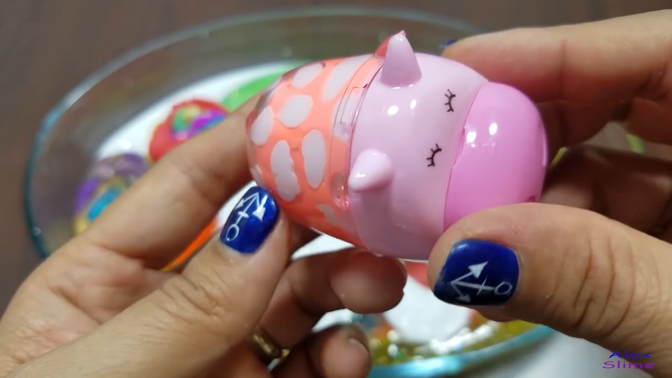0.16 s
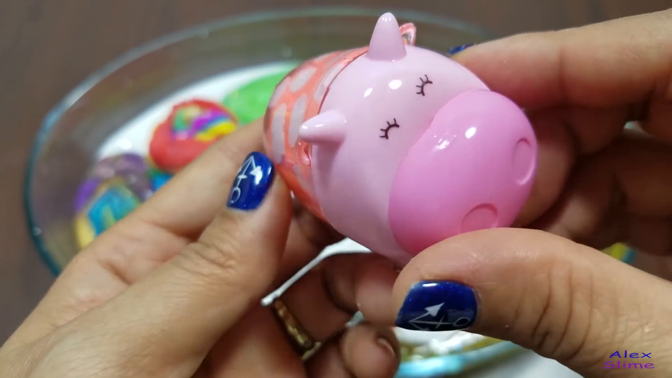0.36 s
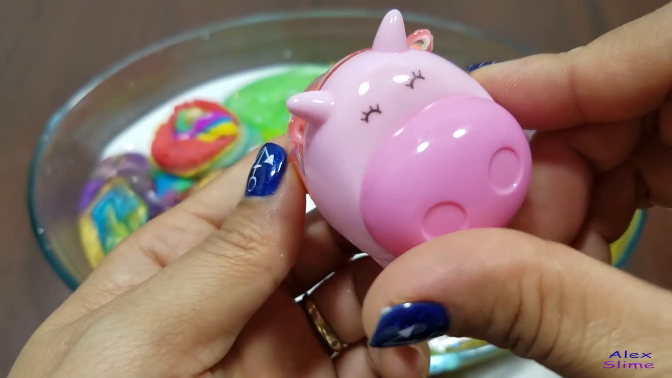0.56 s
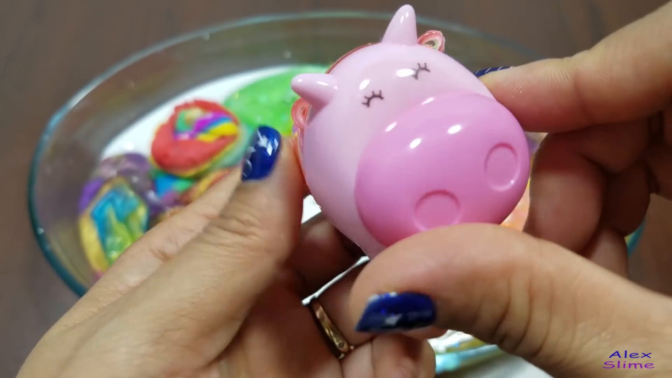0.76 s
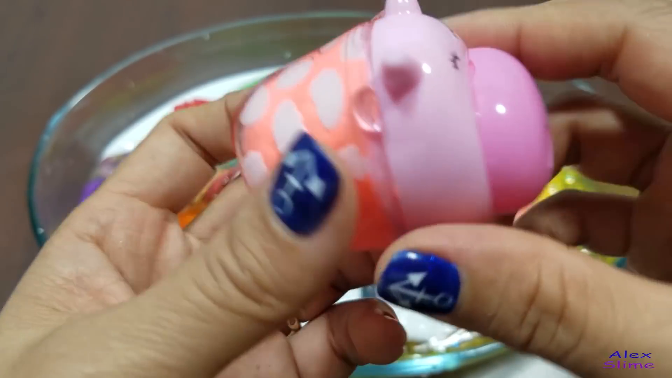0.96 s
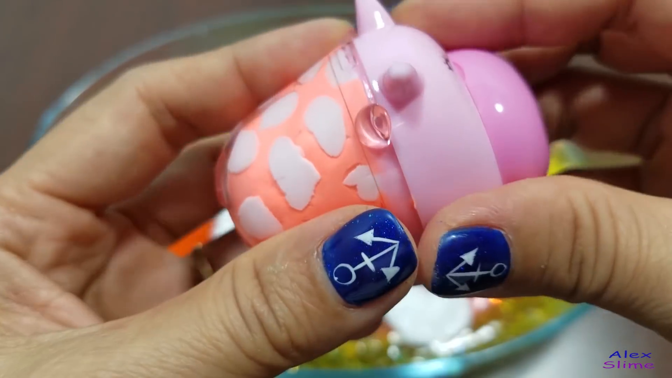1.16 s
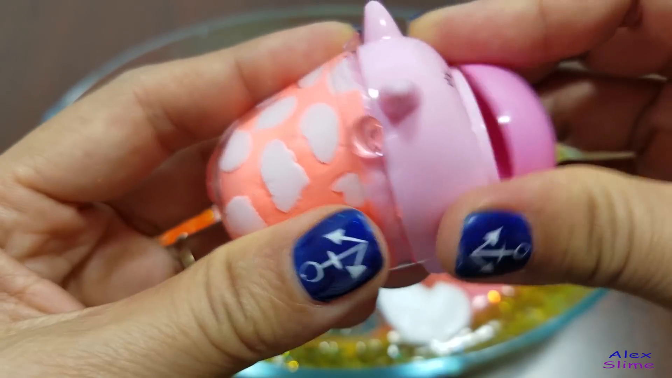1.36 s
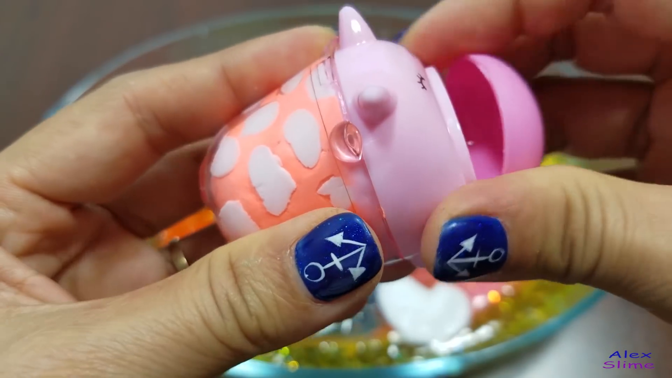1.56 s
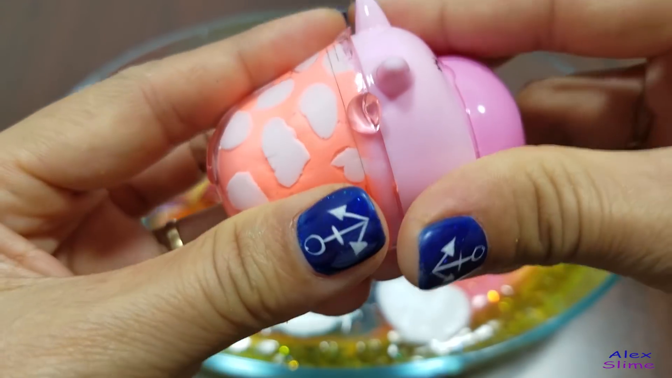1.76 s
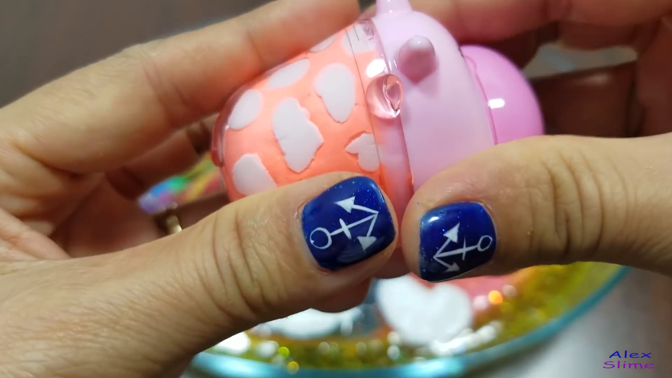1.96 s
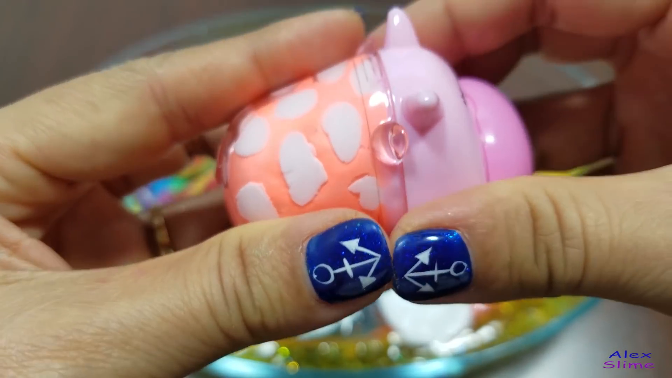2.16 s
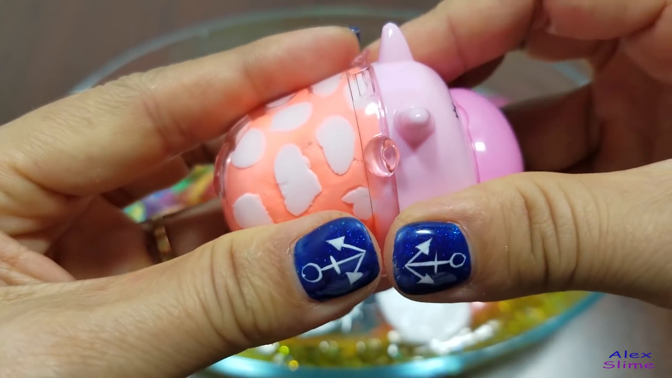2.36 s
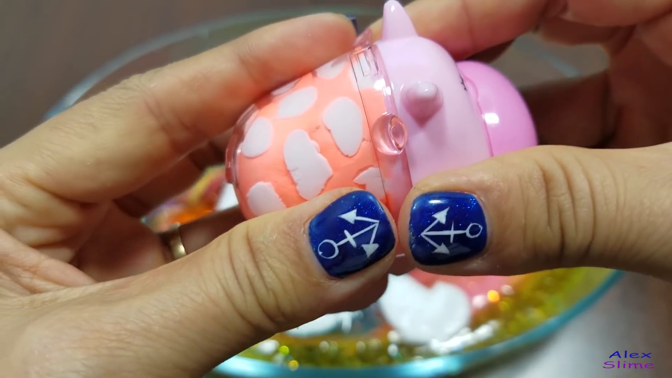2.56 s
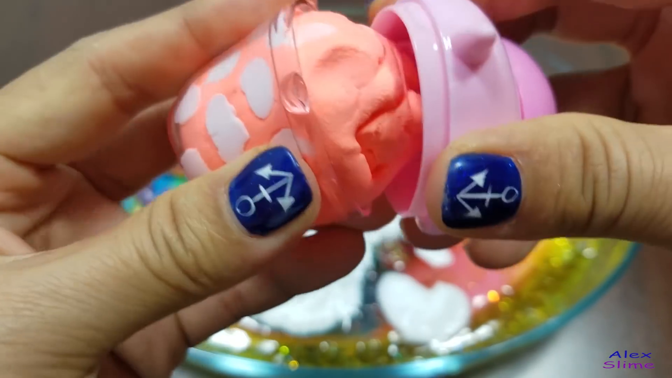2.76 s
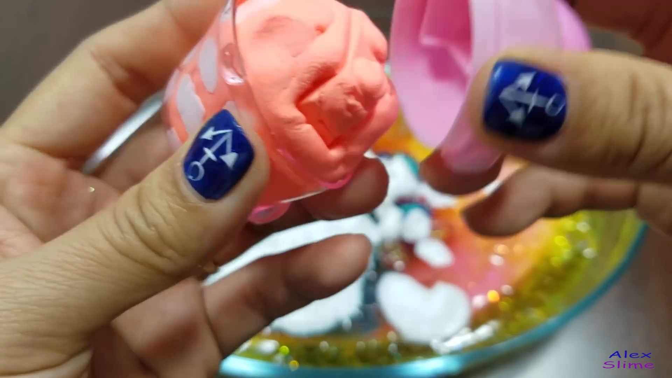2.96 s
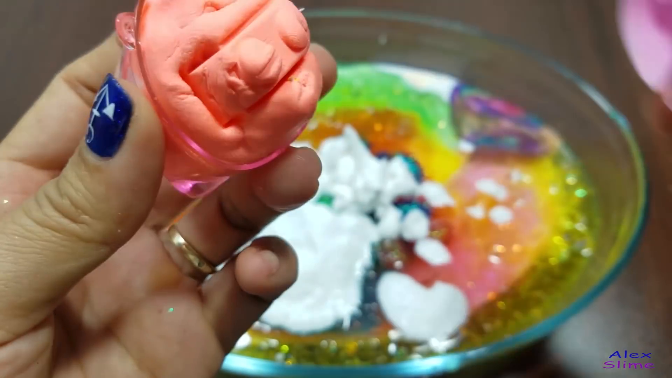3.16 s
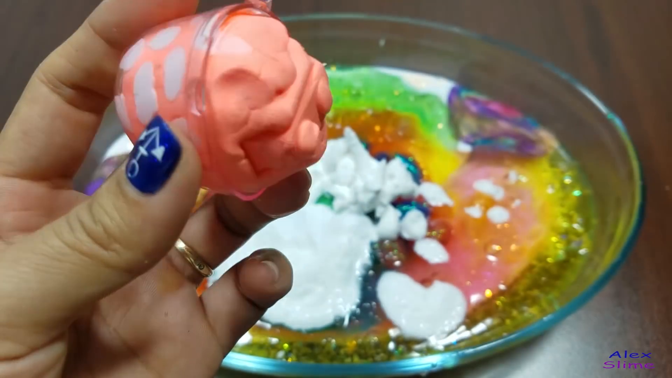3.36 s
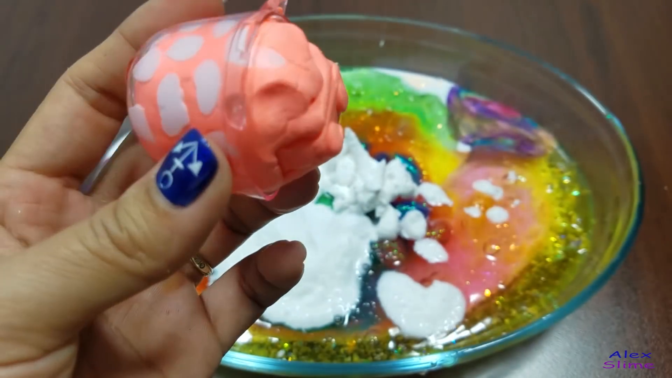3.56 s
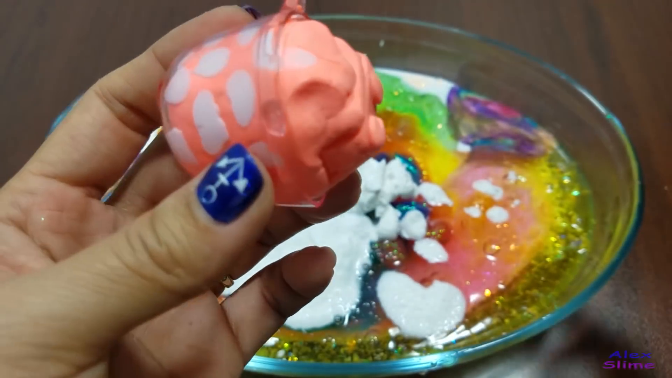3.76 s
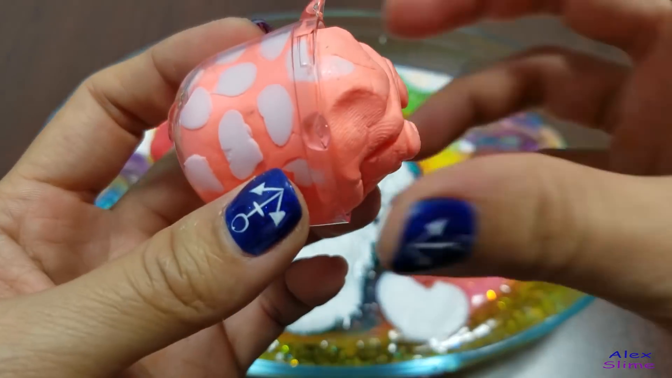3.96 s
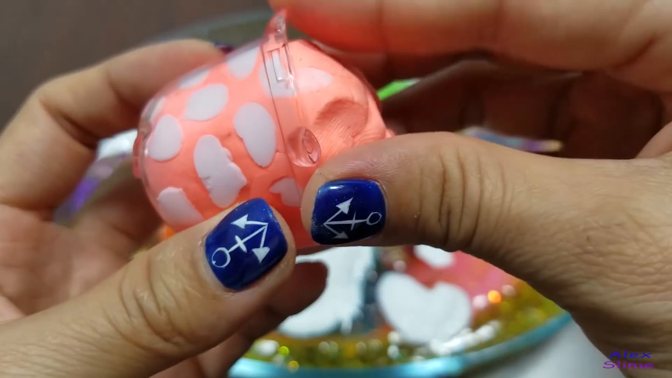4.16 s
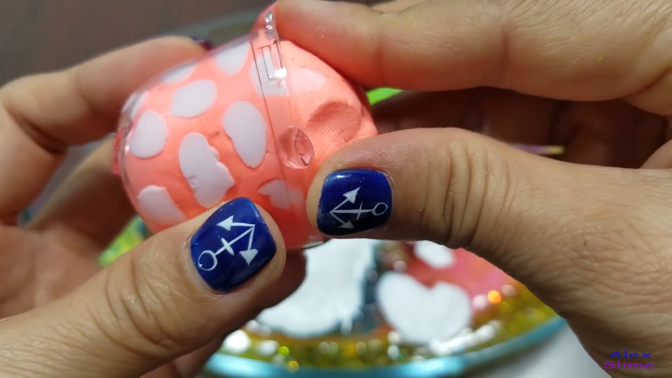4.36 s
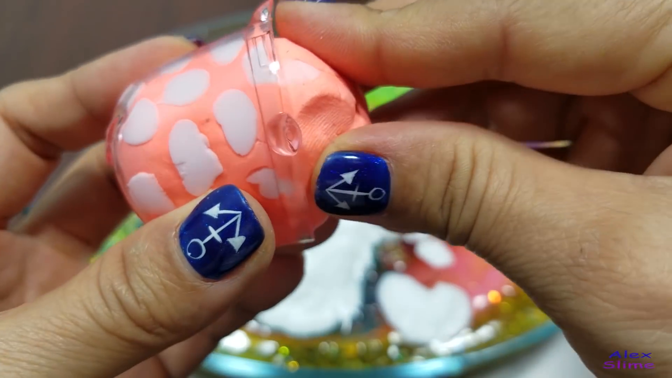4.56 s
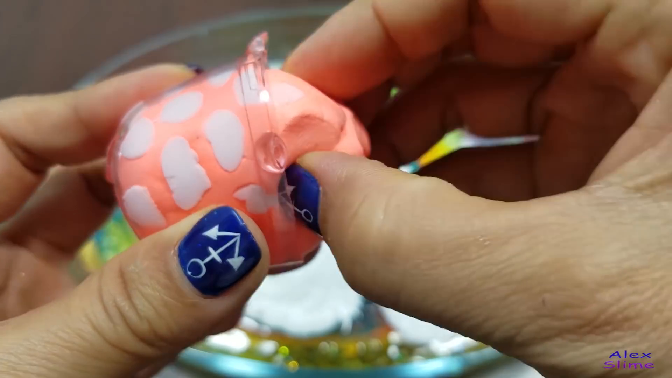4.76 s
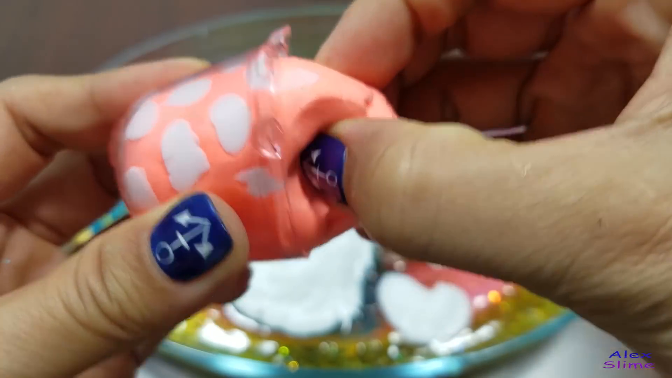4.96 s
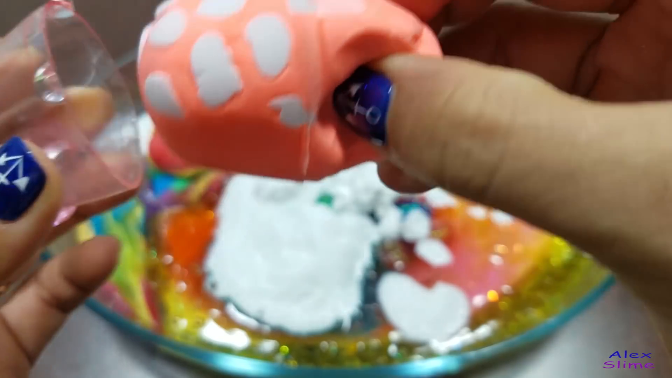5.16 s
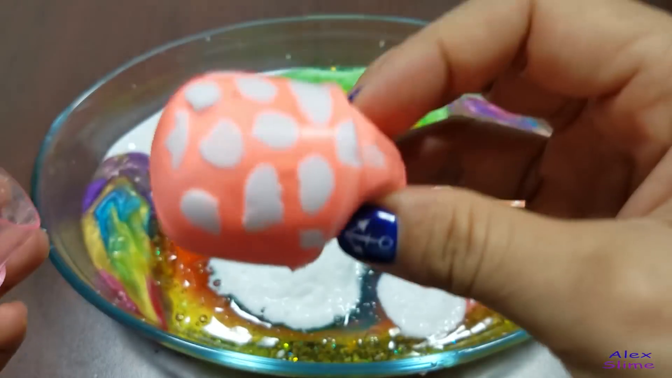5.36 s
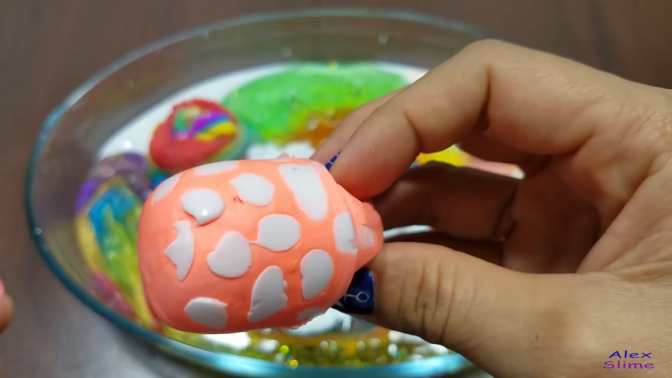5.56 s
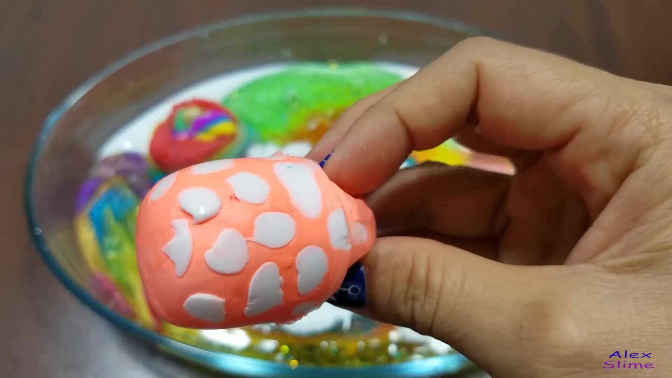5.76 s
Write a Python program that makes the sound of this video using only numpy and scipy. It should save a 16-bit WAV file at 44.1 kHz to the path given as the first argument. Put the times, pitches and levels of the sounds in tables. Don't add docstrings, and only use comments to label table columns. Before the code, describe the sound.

Fingers tick and rub a small hollow plastic capsule, snap it open, its lid clatters onto the table, then a few more nail clicks follow.

```python
import sys
import numpy as np
from scipy import signal
from scipy.fft import rfft, irfft
from scipy.io import wavfile
from scipy.ndimage import uniform_filter1d

SR = 44100
rng = np.random.default_rng(int(sys.argv[2]) if len(sys.argv) > 2 else 0)


def unload_wav(signal):
    wavfile.write(
        sys.argv[1],
        SR,
        np.round(np.clip(np.atleast_2d(signal).T, -1, 1) * 32767).astype(np.int16),
    )


def amplitude_ratio(level_db):
    exponent = np.asarray(level_db, float) / 20
    return 10 ** exponent


N = 256000


def on_log(hz, table):
    f, value = np.array(table).T
    return np.interp(np.log(np.maximum(hz, 1)), np.log(f), value)


def colour(x, table):
    f = np.arange(N // 2 + 1) * SR / N
    y = irfft(rfft(x) * amplitude_ratio(on_log(f, table)), N)
    return y / np.sqrt(np.mean(y ** 2))


def band(x, hz, width):
    edges = [max(hz - width / 2, 20), hz + width / 2]
    y = signal.sosfilt(signal.butter(1, edges, "band", fs=SR, output="sos"), x)
    return y / np.sqrt(np.mean(y ** 2))


def shared_pair(mid, side, alike):
    return np.sqrt(1 + alike) * mid + np.sqrt(1 - alike) * side * np.array([[1], [-1]])


def high_pass(x, hz):
    return signal.sosfilt(signal.butter(2, hz, "high", fs=SR, output="sos"), x)


def walk(rate):
    k = int(SR / rate)
    held = np.repeat(rng.standard_normal(N // k + 1), k)
    return 1.3 * uniform_filter1d(uniform_filter1d(held, k), k)[:N]


def ring(modes, t, chance, scatter_db):
    hz, width, db = np.transpose(modes)[:, :, None]
    count = len(hz)
    gain = amplitude_ratio(db + scatter_db * chance[:count, None])
    start = 2 * chance[-count:, None] * (np.arange(count)[:, None] > 0)
    decay = np.exp(-np.pi * np.abs(width) * t)
    y = np.sum(gain * decay * np.sin(2 * np.pi * hz * t + start), axis=0)
    return y / np.max(np.abs(y))


def hits(table, modes, edges, support, q, crack_ms, lag_ms, pan_db, trim_db, crack_db, thump_db):
    out, t = np.zeros((2, N + 8192)), np.arange(6000) / SR
    brief = t[:256]
    for s, db, hz, crack in table:
        chance, grit = rng.standard_normal(24), rng.standard_normal((3, len(t)))
        body = -ring([(hz, hz / q, 0)] + modes, t, chance, scatter_db=2.5) * (1 - np.exp(-t * hz * 4))
        burst = (grit[0] + grit[1:]) * np.exp(-t / (crack_ms / 1000))
        edge_ring = ring(edges, brief, chance[12:], scatter_db=1.5) * (1 - np.exp(-brief * 2e4))
        edge = signal.fftconvolve(burst, np.diff(edge_ring)[None], axes=1)[:, :len(t)]
        both = body + amplitude_ratio(crack + crack_db) * edge / np.max(np.abs(edge))
        low = -amplitude_ratio(thump_db) * ring(support, t, chance[6:], scatter_db=2.5) * (1 - np.exp(-t * 1500))
        for ear, side in enumerate((1, -1)):
            i = int((s + side * lag_ms / 2000) * SR)
            out[ear, i:i + len(t)] += (both[ear] * amplitude_ratio(side * pan_db / 2) + low) * amplitude_ratio(db + trim_db)
    return out[:, :N]


# f/Hz, likeness [0-1]
AIR_LIKENESS = [(60, 0.6), (130, 0.1), (300, 0.5), (640, 0.15), (1400, 0)]
# f/Hz, density [dB per Hz]
RUMBLE = [(12, -46), (20, -3.5), (26, -32.5), (60, -2), (94, -7), (174, -7), (430, -13.5)]
# f/Hz, density [dB per Hz]
MIC_HISS = [(900, -18.5), (2010, -17.5), (6000, -32), (10300, -35.5), (13300, -27.5), (15850, -27),
            (16500, -30.5)]


def air():
    alike = np.clip(on_log(np.arange(N // 2 + 1) * SR / N, AIR_LIKENESS), 0, 1)
    mid, side = rfft(rng.standard_normal((2, N)))
    pair = irfft(shared_pair(mid, side, alike), N)
    level_db = -63 + 2.5 + .4 * walk(3)
    return colour(pair, RUMBLE + MIC_HISS) * amplitude_ratio(level_db)


# f/Hz, density [dB per Hz]
RUB_HISS = [(1800, -38), (3000, -12), (5500, -15), (8000, -12), (11000, -13.5), (14000, -7), (16000, -18)]
# t/s, length/s, hiss level/dB
BRUSHES = [(.19, 0.046, -71), (0.755, .03, -72), (0.865, 0.073, -68.5), (1.04, .022, -68.5),
           (1.702, 0.045, -65.5), (4.772, 0.047, -64), (4.834, 0.009, -66.5), (4.872, .073, -69),
           (4.924, .014, -65), (4.957, 0.015, -50), (5.021, 0.061, -63), (5.151, 0.019, -63),
           (5.17, 0.12, -71)]
# t/s, length/s, hiss level/dB, shell ring f/Hz, ring level/dB over the hiss
SLIDES = [
    (1.331, 0.042, -71, 1660, 9.5),
    (1.614, 0.045, -62.5, 1780, -3),
    (3.999, .025, -80.5, 880, 12),
    (4.135, 0.046, -63, 1000, -2),
    (4.459, 0.016, -56, 1130, 4.5),
    (4.519, 0.0214, -63, 1040, -1),
    (4.962, 0.0142, -48.5, 6150, 2.5),
    (4.974, 0.0493, -55.5, 1860, -0.5),
]
# t/s, length/s, hiss level/dB, shell ring f/Hz, ring level/dB over the hiss
SCRAPES = [
    (1.365, 0.027, -56.5, 2800, 7.3),
    (1.551, 0.053, -60.5, 3300, 5.6),
    (2.577, 0.051, -46, 1070, 10.3),
    (4.938, 0.021, -51, 2440, 8.1),
]


def rubbing(grain_db, alike, edge_ms, q):
    slip = amplitude_ratio(grain_db * walk(500) + .8 * walk(90))
    noise = rng.standard_normal((3, N)) * slip
    noise = alike * noise[0] + noise[1:]
    hiss, out = colour(noise, RUB_HISS), np.zeros((2, N))
    # ring f/Hz and level/dB where lacking, then the level change/dB over its length
    rubs = [(*row, 2100, -8, -3.5) for row in BRUSHES]
    rubs += [(*row, 0.7) for row in SLIDES]
    rubs += [(*row, -13.5) for row in SCRAPES]
    for s, length, hiss_db, hz, ring_db, fade_db in rubs:
        t = np.arange(int(length * SR)) / SR
        at = slice(int(s * SR), int(s * SR) + len(t))
        contact = np.minimum(np.minimum(t, length - t) * 1000 / edge_ms, 1)
        touch = contact * amplitude_ratio(hiss_db + fade_db * t / length)
        out[:, at] += touch * (hiss[:, at] + amplitude_ratio(ring_db) * band(noise[:, at], hz, hz / q))
    return out


# f/Hz, width/Hz, level/dB
SHELL_MODES = [(407, 285, -9), (757, 260, -14.5), (1600, 500, -2.5), (2187, 126, -9.5), (3300, 590, -11),
               (4630, 2000, 6)]
# f/Hz, width/Hz, level/dB
CRACK_MODES = [(5130, 2400, -2.5), (6860, 5700, 16), (8780, 1500, -6.5), (11730, 13000, -22),
               (14570, 1400, 0.5)]
# f/Hz, width/Hz, level/dB
HAND_MODES = [(112, 58, -1), (198, 41, -13), (348, 130, 3.5)]
# t/s, level/dB, f/Hz, crack level/dB
LEFT_TICKS = [(0.969, -42.5, 2000, -14), (1.5512, -33.5, 3860, -8.5), (3.8183, -48, 2270, -14),
              (4.0593, -40, 2000, -19), (4.1316, -49, 1190, 7.5), (4.152, -46.5, 1165, 8.5),
              (4.167, -44, 1040, 4), (4.4672, -31, 1600, 4.5), (4.9023, -63.5, 600, 25),
              (4.941, -38, 1920, 11), (4.967, -34.5, 1800, 4.5), (4.9696, -26, 1020, -7),
              (4.99, -34, 1300, -24), (5.2097, -43, 2300, -2)]
# t/s, level/dB, f/Hz, crack level/dB
RIGHT_TICKS = [(1.6437, -31.5, 2000, -8), (2.3125, -42, 1600, -12), (2.4188, -43, 1600, -7),
               (2.8328, -47, 1985, -15), (4.46, -46.5, 1600, -13), (4.4696, -37.5, 1210, 9),
               (4.9435, -28, 3250, -16), (4.9462, -35, 1990, -5), (4.964, -29.5, 1300, -8),
               (4.979, -33, 1070, -20), (5.004, -48, 1700, -15), (5.2415, -43, 2090, -11)]
# t/s, level/dB, f/Hz, crack level/dB
KNOCKS = [
    (1.342, -41, 1090, -11),
    (2.148, -50.5, 595, 1),
    (5.027, -44, 2290, 6),
]


def fingers():
    def tick(table, pan_db, thump_db):
        return hits(table, SHELL_MODES, CRACK_MODES, HAND_MODES, q=4.7, crack_ms=0.73, lag_ms=-.1,
                    pan_db=pan_db, trim_db=2.2, crack_db=-5.5, thump_db=thump_db)
    left = tick(LEFT_TICKS, pan_db=8.5, thump_db=-12.0)
    right = tick(RIGHT_TICKS, pan_db=-0.5, thump_db=-29.0)
    return left + right + tick(KNOCKS, pan_db=2.0, thump_db=-4.5)


# f/Hz, T60/s
ROOM_T60 = [(125, .8), (250, 0.67), (500, 0.38), (1000, 0.4), (2000, 0.45), (4000, 0.38), (8000, 0.3),
            (13000, 0.32)]
# f/Hz, level/dB
ROOM_COLOUR = [(125, 5), (250, 0.5), (500, 4), (1000, 5), (2000, 3.5), (4000, 7.5), (8000, -5.5),
               (13000, 4.5)]
# f/Hz, likeness [0-1]
ROOM_LIKENESS = [(125, .8), (250, .8), (500, 1), (1000, 0), (13000, 0.01)]
# T60/s, level/dB
STANDING_WAVE = (1.0, -7.5)
STANDING_WAVE_HZ = 176


def room(x, onset_ms):
    t, tail = np.arange(SR) / SR, 0
    for (hz, t60), (_, db) in zip(ROOM_T60, ROOM_COLOUR):
        alike = np.clip(on_log(hz, ROOM_LIKENESS), 0, 1)
        mid, side = band(rng.standard_normal((2, SR)), hz, hz * .7) / np.sqrt(1000 / hz)
        tail = tail + amplitude_ratio(db - 60 * t / t60) * shared_pair(mid, side, alike)
    t60, db = STANDING_WAVE
    tail = tail + amplitude_ratio(db - 60 * t / t60) * np.sin(2 * np.pi * STANDING_WAVE_HZ * t)
    build_up = 1 - np.exp(-(t * 1000 / onset_ms) ** 2)
    tail = tail * build_up / np.sqrt(np.sum(tail ** 2) / 2)
    return signal.fftconvolve(x[None], tail, axes=1)[:, :N]


# f/Hz, width/Hz, level/dB
CAP_MODES = [(800, 400, -10), (1500, 400, -6), (2300, 400, -5), (2900, 14, -23), (3300, 400, -10),
             (4100, 500, -7)]
# t/s, level/dB, f/Hz, crack level/dB
CAP_CLICK = [
    (1.3621, -33, 1520, -24),
    (1.3648, -29, 2770, -3),
]


def cap_click():
    return hits(CAP_CLICK, CAP_MODES, CRACK_MODES, HAND_MODES, q=6.5, crack_ms=1.0, lag_ms=-.1,
                pan_db=-3.5, trim_db=1.6, crack_db=0.0, thump_db=-12.5)


# f/Hz, width/Hz, level/dB
GRIP_MODES = [(152, 92, 2), (237, 110, -1), (352, 150, 7)]
# t/s, level/dB, f/Hz, crack level/dB
SNAPS = [
    (2.5745, -20, 1080, -18),
    (2.5797, -18.5, 1180, -13),
    (2.5812, -24, 1120, -8),
    (2.5855, -24, 920, -13),
    (2.5864, -20, 1120, -14),
    (2.5893, -22, 1200, -9),
    (2.5925, -27, 1060, -11),
    (2.6018, -21, 690, -12),
    (2.6085, -26, 2220, -13),
]
# t/s, level/dB, f/Hz, crack level/dB
RIM_CLICK = [
    (2.652, -18, 1057, -12),
    (2.6527, -33, 4440, -15),
    (2.6545, -33.5, 2180, -20),
    (2.657, -34.5, 1000, -23),
]


def rim_snaps():
    def snap(table, q, pan_db, thump_db):
        return hits(table, SHELL_MODES, CRACK_MODES, GRIP_MODES, q=q, crack_ms=1.04, lag_ms=-0.1,
                    pan_db=pan_db, trim_db=6.5, crack_db=-3.0, thump_db=thump_db)
    slips = snap(SNAPS, q=3.4, pan_db=0.7, thump_db=-14.0)
    return slips + snap(RIM_CLICK, q=3.6, pan_db=2.3, thump_db=-31.0)


def whine():
    start_s, length_s, edge_s = 3.11, .24, .05
    t = np.arange(N) / SR - start_s
    swell = np.clip(np.minimum(t, length_s - t) / edge_s, 0, 1)
    return amplitude_ratio(-77) * swell * band(rng.standard_normal((2, N)), hz=13800, width=310)


# f/Hz, width/Hz, level/dB
LID_MODES = [(543, 120, -16.5), (790, 100, -14.5), (1000, 250, -9.5), (1330, 120, -11.5), (1773, 200, -4.5),
             (2100, 120, -6), (2800, 1000, -17.5), (3400, 140, -6.5), (4040, 640, -7.5),
             (5100, 2000, -11.5)]
# f/Hz, width/Hz, level/dB
LID_CRACK_MODES = [(5000, 1400, -8), (6200, 800, 0), (7600, 1200, -6), (8900, 1000, -10),
                   (10800, 2000, -12), (12800, 1500, -15), (15000, 2000, -21)]
# f/Hz, width/Hz, level/dB
TABLE_MODES = [(174.8, 25, -13.5), (261, 41, 8.5), (316, 65, 6.5), (430, 30, 4)]
# t/s, level/dB, f/Hz, crack level/dB
LANDING = [
    (3.3668, -7, 902, -13.5),
    (3.3676, -13, 1797, -9),
    (3.371, -9.5, 1300, -14),
    (3.3716, -9, 3950, -12.5),
    (3.3766, -15, 1100, -15),
    (3.3813, -13.5, 1500, -16),
]
# t/s, level/dB, f/Hz, crack level/dB
BOUNCES = [
    (3.3896, -17, 1800, 6.5),
    (3.3908, -8, 5900, 4),
    (3.3931, -13, 3300, -7.5),
    (3.398, -17.5, 1400, -4),
    (3.4016, -16.5, 2900, -8),
    (3.415, -18, 3400, -15),
]


def lid():
    def blow(table, modes, crack_ms):
        return hits(table, modes, LID_CRACK_MODES, TABLE_MODES, q=6, crack_ms=crack_ms, lag_ms=0.28,
                    pan_db=-6.0, trim_db=4.0, crack_db=-1.5, thump_db=-23.5)
    drop = blow(LANDING, LID_MODES[:6], crack_ms=1.6) + blow(BOUNCES, LID_MODES, crack_ms=1.2)
    return high_pass(drop, 210)


# f/Hz, density [dB per Hz]
RATTLE = [(90, -39.5), (170, -7), (800, -12.5), (1700, -4), (3300, -5.5), (6000, -14), (10000, -16.5),
          (16000, -31)]


def rattle(pan_db):
    start_s, fade_s, level_db = 3.3672, 0.03, -26.5
    t = np.arange(N) / SR - start_s
    chatter = colour(rng.standard_normal((2, N)), RATTLE) * (t > 0) * np.exp(-np.abs(t) / fade_s)
    return chatter * amplitude_ratio(level_db + np.array([[pan_db], [-pan_db]]) / 2)


def scene():
    handling = cap_click() + fingers()
    snaps, drop = rim_snaps(), lid()
    chatter = rattle(pan_db=-4.5)
    send = amplitude_ratio(-15.0) * handling + amplitude_ratio(-17.0) * snaps + amplitude_ratio(-14.0) * drop + amplitude_ratio(3.5) * chatter
    wet = sum(room(half, onset_ms=12.0) for half in send)
    near = handling + snaps + drop + amplitude_ratio(-2.0) * chatter + wet
    near = near + rubbing(grain_db=0.9, alike=0.63, edge_ms=0.69, q=2.2)
    return high_pass(near, 60) + air() + whine()


def band_limit(x):
    return signal.sosfilt(signal.butter(12, 16810, fs=SR, output="sos"), x)


def record(dry):
    rounded = np.tanh(.9 * dry) / .9
    top_cut = signal.ellip(10, .3, 45, 15850, fs=SR, output="sos")
    mix = signal.sosfilt(top_cut, rounded) - .0008
    return band_limit(mix)


dry = scene()
out = record(dry)
unload_wav(out)
```